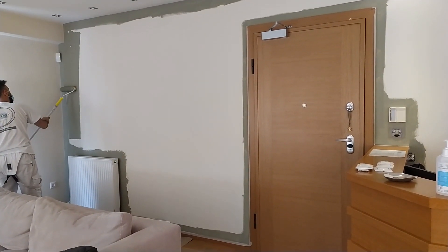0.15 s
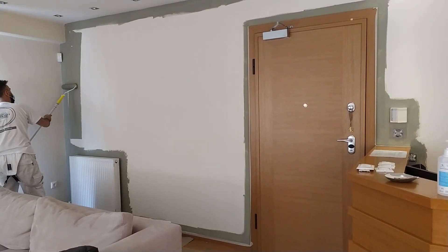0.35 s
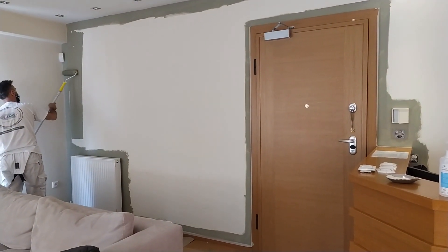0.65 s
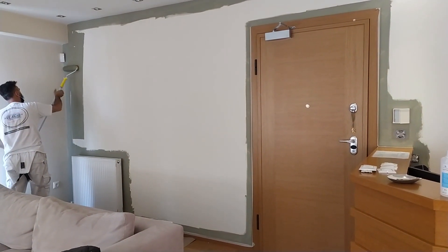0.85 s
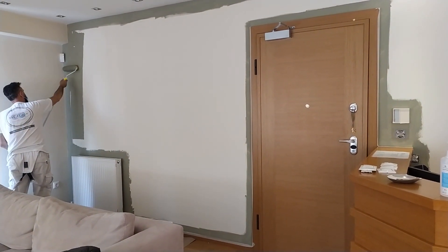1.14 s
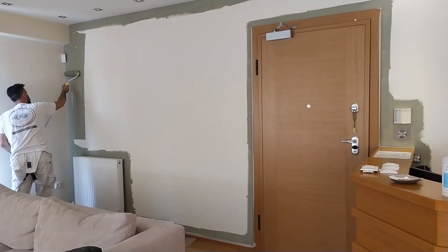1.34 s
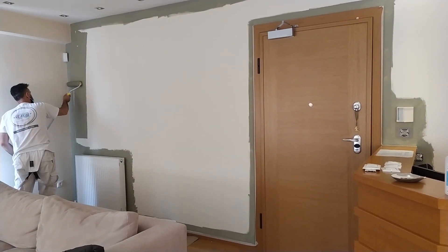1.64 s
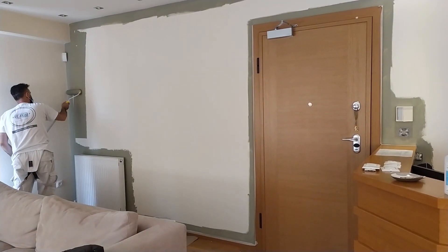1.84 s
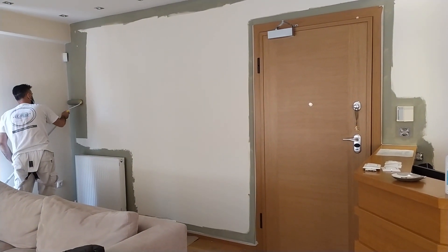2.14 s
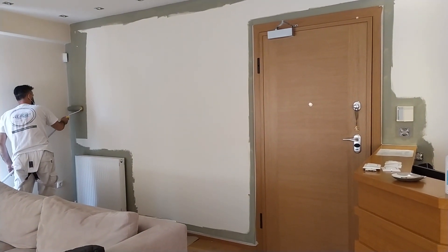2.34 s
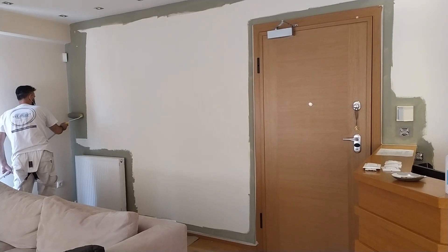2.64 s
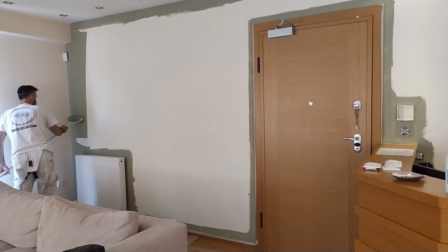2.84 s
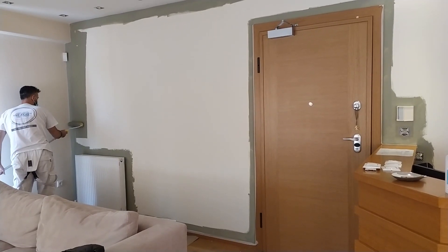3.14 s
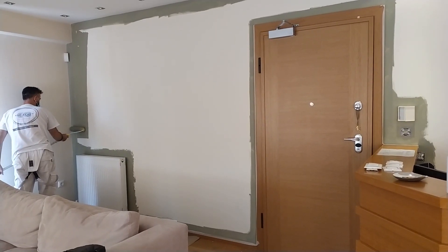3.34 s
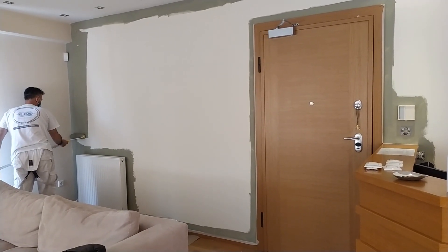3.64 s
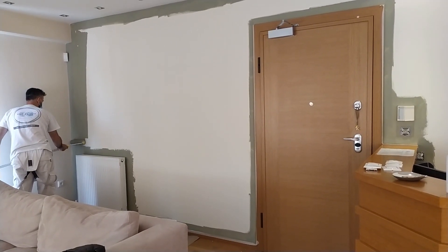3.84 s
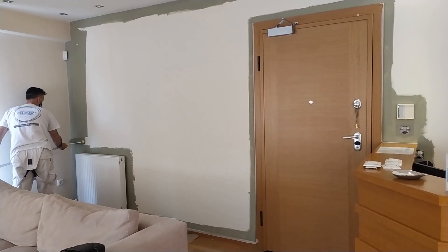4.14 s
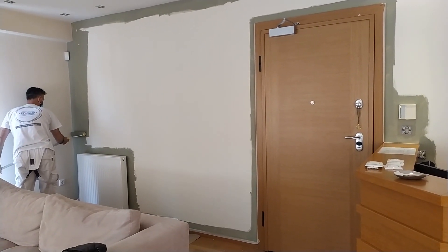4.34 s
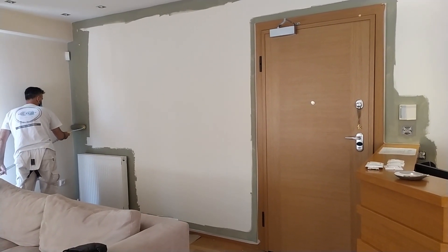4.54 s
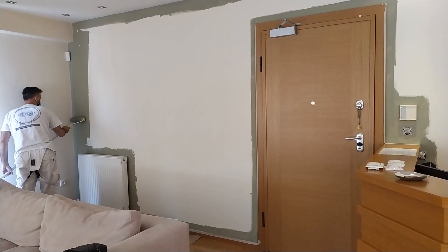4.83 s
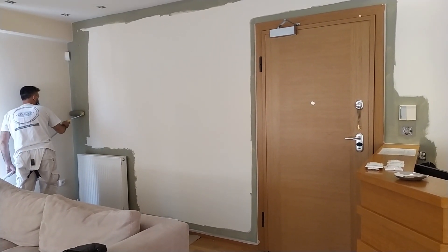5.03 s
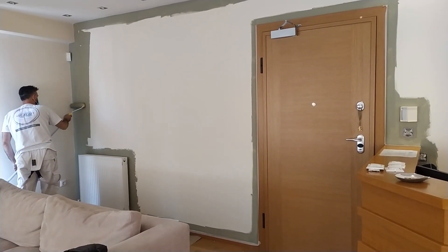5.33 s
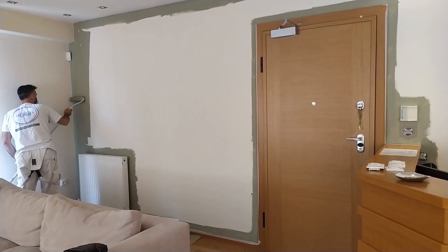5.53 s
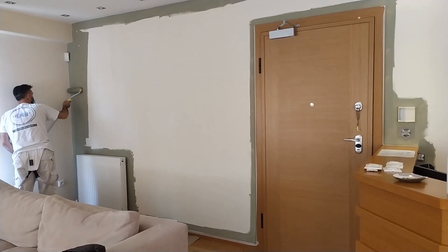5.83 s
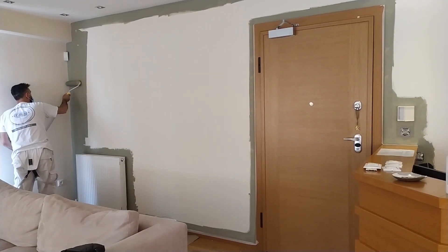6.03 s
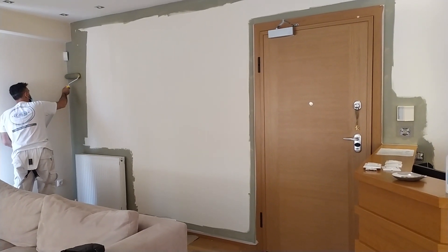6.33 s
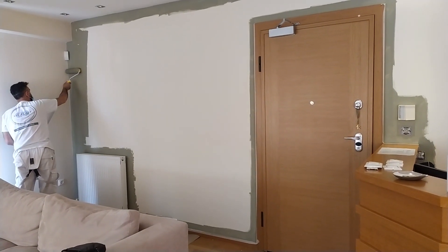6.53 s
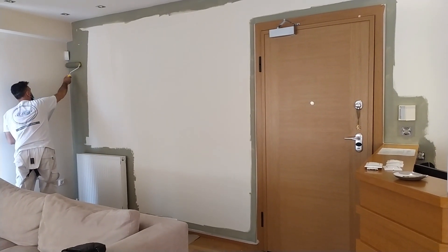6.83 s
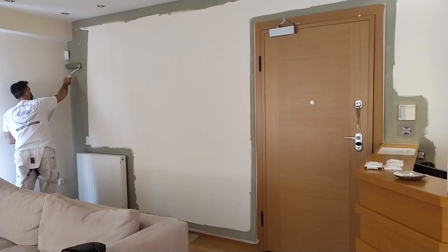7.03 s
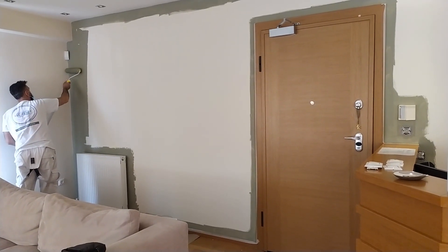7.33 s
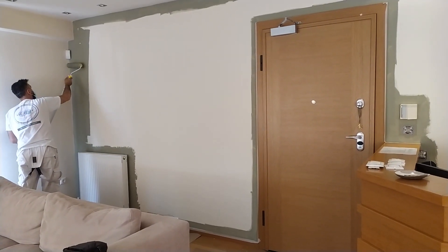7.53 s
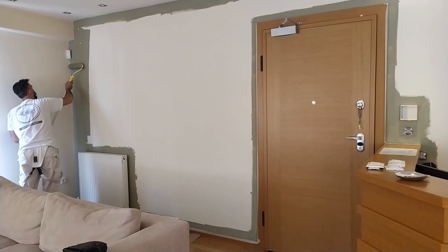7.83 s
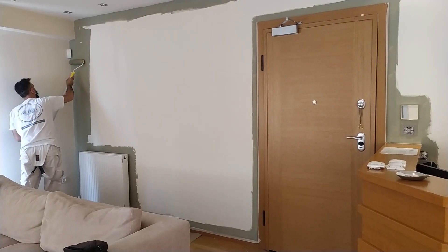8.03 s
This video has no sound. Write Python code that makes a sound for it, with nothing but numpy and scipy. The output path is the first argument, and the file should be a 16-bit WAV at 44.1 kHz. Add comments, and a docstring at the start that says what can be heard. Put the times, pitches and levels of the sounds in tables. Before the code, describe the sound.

A wet paint roller hisses stickily up and down an indoor wall over a low ventilation hum, with a few pole clacks near the end.

```python
"""A dense sticky hiss comes first, over a ventilation hum: a wet paint roller on a pole runs up and down a wall.
Random clicks stand for paint threads snapping off the nap; diffuse noise follows their power, and the hiss
sinks at each turn. Coarser clicks make the sleeve skid at about 0.5 and 1.2 s, a ringing sine ticks drily
at the left microphone at 3.4 s, and struck resonances make the pole and frame clack near the end.
Wandering tones, coloured noise and room resonances make the ventilation of the furnished living room."""
import sys
import numpy as np
from scipy import signal
from scipy.fft import rfft, irfft, next_fast_len
from scipy.io import wavfile
from scipy.ndimage import uniform_filter1d, map_coordinates

SR = 44100
rng = np.random.default_rng(int(sys.argv[2]) if len(sys.argv) > 2 else 0)


def file_out(sig):
    """Save sig as 16-bit WAV at sys.argv[1]."""
    # one column per channel
    cols = np.atleast_2d(sig).T
    # limit, then scale
    lim = np.clip(cols, -1, 1)
    pcm = np.round(lim * 32767).astype(np.int16)
    wavfile.write(sys.argv[1], SR, pcm)


N = 360297
TIME = np.arange(N) / SR


def from_db(db):
    """Decibels to amplitude gain."""
    return 10 ** (np.asarray(db) / 20)


def rms_one(x):
    """Scale to unit power."""
    return x / np.sqrt(np.mean(x ** 2) + 1e-20)


def in_time(rows):
    """Interpolate rows of (s, value, ..) to one curve per value column."""
    s, *columns = np.transpose(rows)
    return [np.interp(TIME, s, column) for column in columns]


def at_hz(points, hz):
    """Read a table of (Hz, value) on a log-frequency axis."""
    table_hz, value = np.transpose(points)
    return np.interp(np.log(hz + 1e-6), np.log(table_hz), value)


def colour(x, spectrum):
    """Filter by a table of (Hz, dB)."""
    padded = next_fast_len(x.shape[-1] + 2048)
    gain = from_db(at_hz(spectrum, np.fft.rfftfreq(padded, 1 / SR)))
    return irfft(rfft(x, padded) * gain, padded)[..., :x.shape[-1]]


def place(pair, pan):
    """Share a level difference, in (Hz, left minus right dB), between the two sides."""
    left = colour(pair[0], [(hz, db / 2) for hz, db in pan])
    right = colour(pair[1], [(hz, -db / 2) for hz, db in pan])
    return np.array([left, right])


def band(x, low_hz, high_hz):
    """Causal band-pass."""
    edges_hz = [low_hz, min(high_hz, SR / 2 - 1000)]
    return signal.sosfilt(signal.butter(2, edges_hz, "band", fs=SR, output="sos"), x)


def resonate(x, hz, width_hz):
    """Noise through one narrow resonance; the last N samples at unit power."""
    edges_hz = [hz - width_hz / 2, hz + width_hz / 2]
    sos = signal.butter(2, edges_hz, "band", fs=SR, output="sos")
    return rms_one(signal.sosfilt(sos, x)[:, -N:])


def ring(clicks, hz, t60_s):
    """A unit click sets a decaying sine of nominal height 1 ringing in a two-pole resonator."""
    radius = 1000 ** (-1 / (t60_s * SR))
    angle = 2 * np.pi * hz / SR
    poles = [1, -2 * radius * np.cos(angle), radius ** 2]
    return signal.lfilter([0, np.sin(angle)], poles, clicks + 1e-18)


# Room sound at the two microphones. Each row: frequency in Hz, likeness in phase (-1 to 1),
# likeness a quarter cycle ahead on the left (-1 to 1).
MIC_LIKENESS = [(60.5, 1, 0.2), (200, 0.97, 0.15), (440, 0.71, 0.25), (804, 0.26, 0.62),
                (1100, -0.17, 0.24), (1250, -0.48, 0.099), (1790, -0.43, -0.68), (2230, 0.13, -0.81),
                (2990, -0.25, 0.00057), (3700, -0.22, 0.4), (4680, 0.17, -0.14), (5870, 0.015, -0.22),
                (6700, -0.17, 0.44), (9800, 0.03, -0.012)]


def diffuse(size):
    """Noise from all round at two spaced microphones: alike in the bass, far less so in the treble."""
    white = rng.standard_normal((2, size))
    first, second = rfft(white)
    hz, table = np.fft.rfftfreq(size, 1 / SR), np.array(MIC_LIKENESS)
    alike = at_hz(table[:, :2], hz) - 1j * at_hz(table[:, ::2], hz)
    alike = alike / np.maximum(abs(alike) / 0.995, 1)   # magnitude stays below 1
    right = alike * first + np.sqrt(1 - abs(alike) ** 2) * second
    return irfft(np.array([first, right]), size)


def moving_room(x, direct_db, decay_s):
    """The echoes of a moving source never repeat: a diffuse wash follows its power."""
    keep = np.exp(-1 / (decay_s * SR))
    power = signal.lfilter([1 - keep], [1, -keep], x ** 2)
    wash = np.sqrt(power) * diffuse(next_fast_len(N))[:, :N]
    wash[0] += from_db(direct_db) * x   # only the left microphone faces the painter
    return wash


def snaps(per_s, spread_db):
    """Random tiny clicks of uneven size and either sign; unit power."""
    sizes = from_db(spread_db * np.minimum(rng.exponential(1, N), 5))
    signs = rng.choice([-1, 1], N)
    happens = rng.random(N) < per_s / SR
    return rms_one(sizes * signs * happens)


def ease(share):
    """Quarter sine from rest to full speed."""
    return np.sin(np.pi / 2 * np.clip(share, 0, 1))


# Roller strokes from turn to turn. Each row: start in seconds, end in seconds, direction (up 1, down -1),
# hiss in dB before band trims, coarse rasp in dB re hiss, fine spray in dB re hiss.
ROLLER_STROKES = [(-0.3, 0.363, -1, -54, -9.5, -2.5), (0.317, 0.937, 1, -53, -7.5, -3.5),
                  (0.84, 1.096, 1, -56, -4.5, -8), (1.105, 1.286, -1, -55, -6.5, -7),
                  (1.25, 4.152, -1, -57, -8.5, -2.5), (4.125, 7, 1, -56, -5.5, -3.5),
                  (7.008, 7.451, 1, -57.5, -6, -3), (7.66, 7.87, -1, -59.5, -5, 0.5),
                  (7.904, 8.5, -1, -59, -4.5, -3.5)]
# How hard the painter leans on the roller, one list per long stroke.
# Each row: time in seconds, hiss in dB (only the departure from the stroke's mean counts).
STROKE_PRESSURE = [
    [(1.45, -54), (1.65, -55), (1.82, -53), (2.96, -60.5), (3.46, -56.5), (3.98, -54.5)],
    [(4.24, -56.5), (4.34, -53.5), (4.8, -55.5), (5.35, -57), (5.98, -55), (6.28, -59.5), (6.55, -58),
     (6.85, -59)],
]
SPEED_UP_S, SLOW_DOWN_S = 0.25, 0.27
HISS_SPEED_POWER, RASP_SPEED_POWER = 0.91, 0.7   # a slow roller sounds coarser
RASP_CLIMB_DB_PER_S, SPRAY_CLIMB_DB_PER_S = 1.2, 1.3   # gain going up, loss coming down
CREEP_DB = -78.5   # the nap still peels a little at the turns; before band trims
TURNS_PER_S, LOPSIDED_DB = 8.2, 0.42   # at full speed; one side of the sleeve is wetter


def strokes():
    """Gains of hiss, rasp and spray as the roller speeds up, rolls under pressure and slows to each turn."""
    power = np.zeros((3, N)) + from_db(CREEP_DB) ** 2
    for start_s, end_s, direction, hiss_db, rasp_db, spray_db in ROLLER_STROKES:
        speed = ease((TIME - start_s) / SPEED_UP_S) * ease((end_s - TIME) / SLOW_DOWN_S)
        turns = TURNS_PER_S * np.cumsum(speed) / SR + rng.random()
        level_db = hiss_db + LOPSIDED_DB * np.sin(2 * np.pi * turns)
        for curve in STROKE_PRESSURE:
            if start_s < curve[1][0] < end_s:   # this curve belongs to this stroke
                lean_db, = in_time(curve)
                level_db = level_db + lean_db - np.average(lean_db, weights=speed)
        climbed_s = np.sign(direction) * (TIME - (start_s + end_s) / 2)   # zero at mid-stroke
        hiss = speed ** HISS_SPEED_POWER
        rasp = speed ** RASP_SPEED_POWER * from_db(rasp_db + RASP_CLIMB_DB_PER_S * climbed_s)
        spray = hiss * from_db(spray_db + SPRAY_CLIMB_DB_PER_S * climbed_s)
        power += (from_db(level_db) * np.array([hiss, rasp, spray])) ** 2
    return np.sqrt(power)


PATCHY_DB, PATCHES_PER_S, PATCH_WIDTH_HZ = 3, 45, 180   # spread and grid of the random gains


def patches(x):
    """Uneven grain: small time-frequency patches of the hiss swell and fade at random."""
    hz, s, cells = signal.stft(x, SR, nperseg=512)
    chance = rng.standard_normal((200, 800))
    where = np.meshgrid(hz / PATCH_WIDTH_HZ, s * PATCHES_PER_S, indexing="ij")
    gain = from_db(PATCHY_DB * map_coordinates(chance, where, order=1, mode="wrap"))
    return signal.istft(cells * gain, SR)[1][..., :N]


# Colour of snapping paint. Each row: frequency in Hz, relative density in dB per Hz.
PAINT_COLOUR = [(900, -11), (1600, -13), (2400, -8), (3400, -3.5), (4300, -4), (4900, -4), (5700, -1),
                (6700, -1.5), (8000, 0.5), (9500, -2), (11500, -3.5), (14000, -5.5), (16000, -11)]
# Frame resonances stirred by the rolling. Each row: frequency in Hz, width in Hz, level in dB re hiss gain.
FRAME_SINGING = [(5810, 79, -24)]
# Roller placement. Each row: frequency in Hz, added left minus right in dB.
ROLLER_PLACE = [(1000, -5), (2000, -0.5), (3500, 5.5), (5900, 7.5), (7500, 4.5), (9500, 2), (12000, 8.5),
                (15000, 12.5)]


def roller():
    """Paint threads snap as the nap peels off; thick threads rasp, thin ones give a fine spray."""
    hiss, rasp, spray = strokes()
    threads = snaps(per_s=5000, spread_db=2.0)
    wash = moving_room(threads, direct_db=-7.0, decay_s=0.013)
    grain = rms_one(colour(patches(wash), PAINT_COLOUR))
    coarse = colour(grain, [(3300, -0.5), (4900, -2.0), (7500, -26)])
    fine = colour(grain, [(7000, -46), (9500, -9.5), (12000, 0)])
    middle = grain - coarse - fine
    sound = from_db(3.5) * hiss * middle
    sound += from_db(9.5) * rasp * coarse
    sound += from_db(2.5) * spray * fine
    for hz, width_hz, db in FRAME_SINGING:
        sound += from_db(db) * hiss * resonate(wash, hz, width_hz)
    return place(sound, ROLLER_PLACE)


# Level of the lowest room resonance. Each row: time in seconds, swell in dB re RUMBLE_DB.
RUMBLE_SWELL_DB = [(0.25, 5), (0.45, -2), (1.05, 4), (1.28, -5), (1.55, 8), (1.9, 0), (3.0, 1), (3.4, 5),
                   (4.05, -6), (4.8, 2.5), (5.4, -11), (5.62, 3), (6.05, 6), (6.25, -12), (6.7, -1),
                   (7.0, 0), (7.6, -2), (8.0, 1)]
RUMBLE_HZ, RUMBLE_WIDTH_HZ, RUMBLE_DB = 64, 12, -60   # level before swell and placement
RUMBLE_STEADY_S = 0.19   # span over which its own power is evened out


def rumble(air):
    """The lowest room resonance, fed by noise, swells and fades along its level curve."""
    low = resonate(air, RUMBLE_HZ, RUMBLE_WIDTH_HZ)
    power = uniform_filter1d(np.mean(low ** 2, axis=0), int(RUMBLE_STEADY_S * SR))
    swell_db, = in_time(RUMBLE_SWELL_DB)
    return from_db(RUMBLE_DB + swell_db) * low / np.sqrt(power)


def drift(knots_per_s):
    """Random curve through evenly timed knots; unit power."""
    knots = rng.standard_normal(4000)
    return rms_one(np.interp(TIME * knots_per_s, np.arange(len(knots)), knots))


# Rush of air. Each row: frequency in Hz, relative density in dB per Hz.
AIR_COLOUR = [(20, -48), (31, -35), (41, -1), (52, -2.5), (75, -0.5), (120, -3.5), (190, -5.5), (300, -9),
              (500, -14), (950, -18), (1500, -20.5), (2500, -26), (5000, -35), (16000, -42)]
AIR_DB = -55.5   # rms before placement
# Room resonances fed by the ventilation. Each row: frequency in Hz, width in Hz, rms in dB before placement.
ROOM_BOOM = [(96.8, 24, -69), (124.3, 14, -68), (218.5, 12, -66), (377.6, 8.3, -83.5), (439.6, 9.9, -81.5)]
# Motor tones. Each row: frequency in Hz, rms in dB before placement, wander as a share of the tone.
MOTOR_HUM = [(149.34, -54.5, 0.2), (99.44, -63.5, 0.25)]
# Ventilation placement. Each row: frequency in Hz, added left minus right in dB.
AIR_PLACE = [(60, 1), (150, 2.5), (400, 0.5), (1200, 0.5), (3000, 1.5), (6000, 1), (14000, -9)]


def ventilation():
    """Motor tones, a rush of air and the room resonances that it keeps ringing."""
    size = next_fast_len(N + SR)   # the spare lead lets the resonances settle
    sound = from_db(AIR_DB) * rms_one(colour(diffuse(size), AIR_COLOUR)[:, -N:])
    air = diffuse(size)
    sound += rumble(air)
    for hz, width_hz, db in ROOM_BOOM:
        sound += from_db(db) * resonate(air, hz, width_hz)
    for hz, db, wander in MOTOR_HUM:
        sway = 1 + wander * (drift(5) + 1j * drift(5.6))   # amplitude and phase
        tone = sway * np.exp(2j * np.pi * hz * TIME)
        sound += from_db(db) * rms_one(tone.real)
    return place(sound, AIR_PLACE)


# The sleeve skids on the wall. Each row: peak time in seconds, drive in dB, rise in seconds, decay in seconds.
SKID_GRIPS = [(.51, -49, 0.055, .09), (.548, -48, .008, 0.0085), (1.205, -52, 0.012, .014)]
# Colour of the skid. Each row: frequency in Hz, gain in dB.
SKID_SPECTRUM = [(500, -39), (1200, 1.5), (2000, 0), (3800, 1), (5500, -11), (9000, -14)]


def skid():
    """The sleeve sticks and slips for a moment, with a coarser and lower grain."""
    grip = np.zeros(N)
    for s, db, rise_s, decay_s in SKID_GRIPS:
        grip += from_db(db) * np.exp(-np.maximum((s - TIME) / rise_s, (TIME - s) / decay_s))
    slips = snaps(per_s=1100, spread_db=3.5) * (grip + 1e-12)
    sound = colour(moving_room(slips, direct_db=-4.5, decay_s=0.014), SKID_SPECTRUM)
    return place(sound, [(1000, 0.76), (4000, 5.4)])


# Tick at the left microphone. Each row: time in seconds, level in dB, ring in Hz, t60 in seconds.
LEFT_TICK = [(3.4038, -17.5, 3470, 0.0006)]


def tick():
    """A tiny dry contact rings one damped sine, heard by the left microphone alone."""
    out = np.zeros((2, N))
    for s, db, hz, t60_s in LEFT_TICK:
        click = from_db(db) * (np.arange(N) == round(s * SR))
        out[0] += ring(click, hz, t60_s)
    return out


# Decay of the room. Each row: frequency in Hz, t60 in seconds.
ROOM_DECAY = [(250, 0.67), (1000, 0.4), (4000, 0.28), (8000, 0.36), (15000, 0.14)]
ROOM_BUILD_S = 0.0043   # the echoes take a moment to gather


def room(x):
    """The diffuse tail of the room, each band decaying at its own rate."""
    t = TIME[:SR // 2]
    scatter = diffuse(len(t))
    edges_hz = np.geomspace(150, 19200, 8)
    tail = np.zeros_like(scatter)
    for k, (low_hz, high_hz) in enumerate(zip(edges_hz, edges_hz[1:])):
        fade = from_db(-60 * t / at_hz(ROOM_DECAY, np.sqrt(low_hz * high_hz)))
        tail += (-1) ** k * band(scatter, low_hz, high_hz) * fade
    tail = tail * np.minimum(t / ROOM_BUILD_S, 1)
    tail = tail / np.sqrt(np.sum(tail ** 2) / 2)   # unit energy per side on average
    return signal.fftconvolve(x[None], tail, axes=1)[:, :N]


def struck(force, modes):
    """A struck body rings in its modes, of alternating sign."""
    return sum((-1) ** k * from_db(db) * ring(force, hz, t60_s) for k, (hz, db, t60_s) in enumerate(modes))


CHATTER_S = 0.0018   # loose parts buzz briefly after each contact


def chatter(chatter_db):
    """One hard contact with a decaying burst of tiny ones; unit energy."""
    t = TIME[:SR // 50]
    burst = rng.standard_normal(len(t)) * np.exp(-t / CHATTER_S)
    force = signal.unit_impulse(len(t)) + from_db(chatter_db) * burst / np.linalg.norm(burst)
    return force / np.linalg.norm(force)


# Clacks. Each row: time in seconds, drive into the roller frame in dB, drive into the pole in dB,
# rebound delay in seconds, rebound in dB re first contact, chatter in dB re hard contact.
POLE_CLACKS = [(7.5695, -29.5, -40.5, 0.0023, -1, 3), (7.7800, -48.5, -59, .003, -7, 4),
               (7.8086, -48.5, -31.5, .0069, -3, 0), (7.8275, -48, -56, 0.0025, -6, 0),
               (7.8475, -46, -63, 0.0042, -10, -1), (7.881, -58, -66, .003, -8, 0)]
# Roller frame modes. Each row: frequency in Hz, relative level in dB, t60 in seconds.
FRAME_MODES = [(470, -19, 0.0084), (895, -11.5, 0.01), (1590, -1, 0.0049), (2190, 0, 0.0037),
               (3020, 1, 0.0088), (3480, 0, 0.0052), (4050, -0.5, 0.0067), (5470, 2, 0.0048),
               (5820, -3.5, 0.011), (6950, -4.5, .003), (8800, -4, 0.0017), (10500, -2, 0.0022),
               (13800, -3, .0008)]
# Hollow pole modes. Each row: frequency in Hz, relative level in dB, t60 in seconds.
POLE_MODES = [(425, -16, 0.0095), (730, -5, 0.011), (1470, -2, 0.0052), (2410, -4.5, 0.016),
              (2710, -7, .005), (4450, -1, 0.0032), (5540, -9, .005), (7000, -6, 0.002)]
CLACK_LEFT_DB, CLACK_RIGHT_DB, CLACK_ROOM_DB = 0.7, -5, 0   # direct left, direct right, room; before placement
MIC_LAG_S = 0.00021   # direct sound reaches the right later


def pole():
    """Each clack is a chattering contact and a quick rebound in frame and pole; the blow fills the room."""
    blows, contacts = np.zeros((2, 2, N))   # rows of each: frame, pole
    for s, frame_db, pole_db, rebound_s, rebound_db, chatter_db in POLE_CLACKS:
        strength = from_db([frame_db, pole_db])
        blows[:, round(s * SR)] = strength
        for start_s, db in ((s, 0), (s + rebound_s, rebound_db)):
            burst = chatter(chatter_db)
            at = round(start_s * SR)
            contacts[:, at:at + len(burst)] += from_db(db) * np.outer(strength, burst)
    near_side = struck(contacts[0], FRAME_MODES) + struck(contacts[1], POLE_MODES)
    whole = struck(blows[0], FRAME_MODES) + struck(blows[1], POLE_MODES)
    far_side = np.roll(near_side, round(MIC_LAG_S * SR))
    direct = from_db([[CLACK_LEFT_DB], [CLACK_RIGHT_DB]]) * np.array([near_side, far_side])
    sound = direct + from_db(CLACK_ROOM_DB) * room(whole)
    return place(sound, [(700, -1.5), (1200, -0.5), (2500, 2.0), (5500, 6.5), (10000, 2)])


def scene():
    """The painter's sounds and the tick over the hum of the room."""
    return roller() + ventilation() + skid() + tick() + pole()


CUTOFF_HZ = 15700


def record(dry):
    """A steep low-pass cuts the top."""
    return signal.sosfilt(signal.ellip(12, 0.1, 80, CUTOFF_HZ, fs=SR, output="sos"), dry)


dry = scene()
out = record(dry)
file_out(out)
```